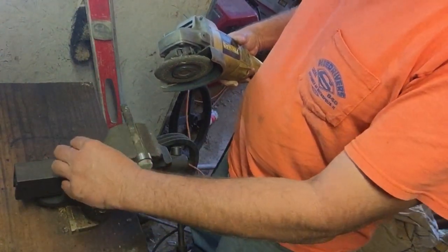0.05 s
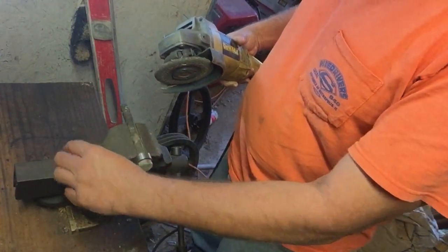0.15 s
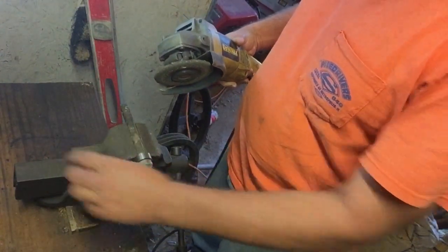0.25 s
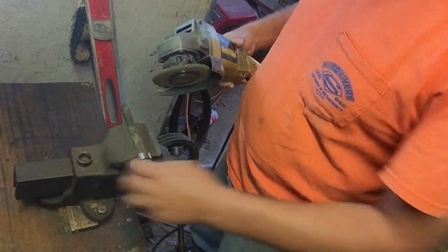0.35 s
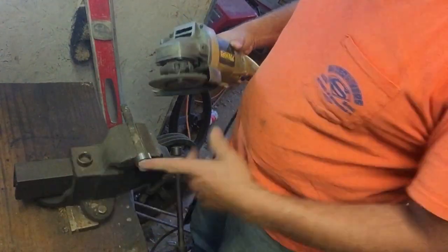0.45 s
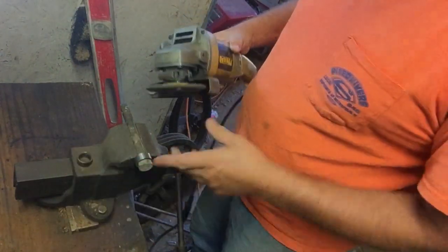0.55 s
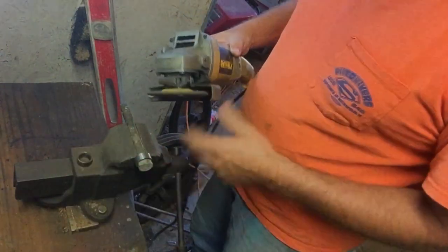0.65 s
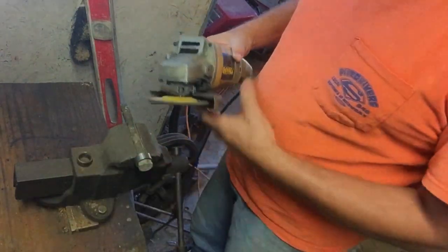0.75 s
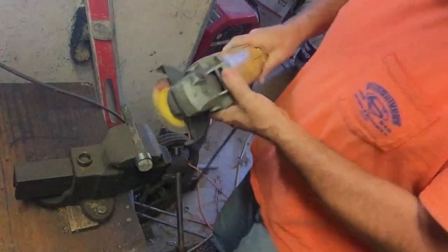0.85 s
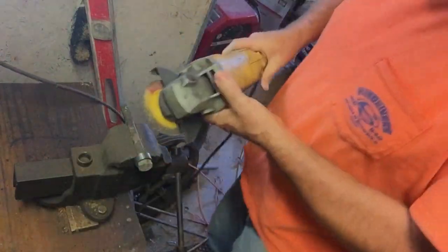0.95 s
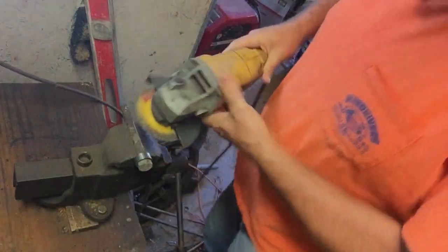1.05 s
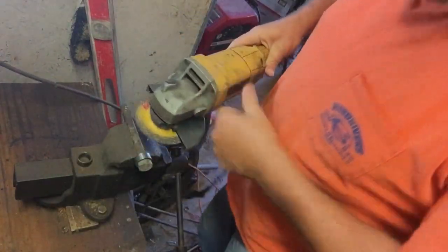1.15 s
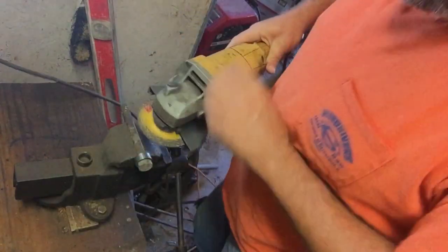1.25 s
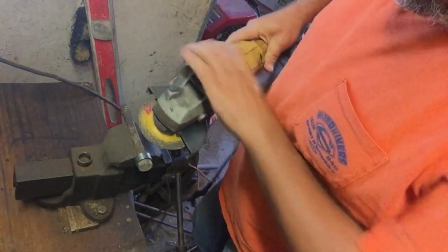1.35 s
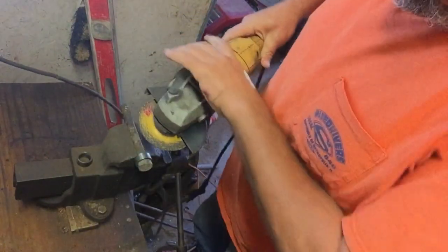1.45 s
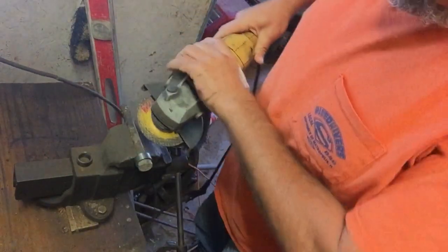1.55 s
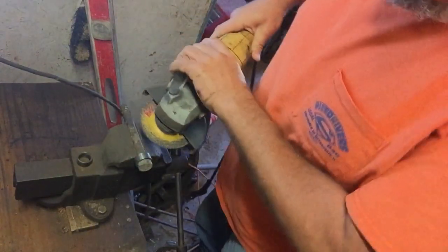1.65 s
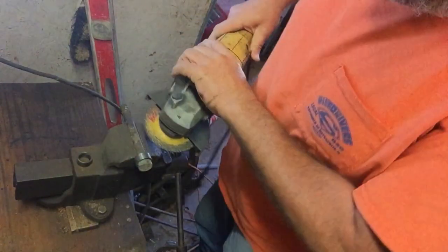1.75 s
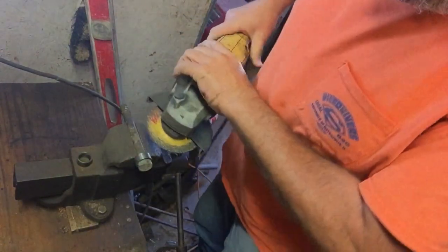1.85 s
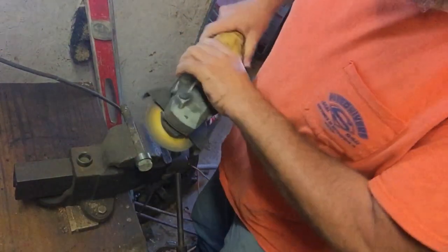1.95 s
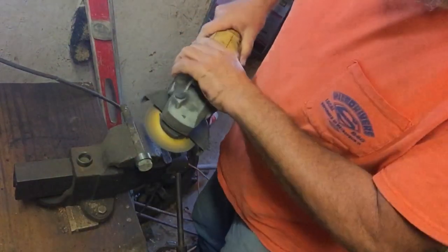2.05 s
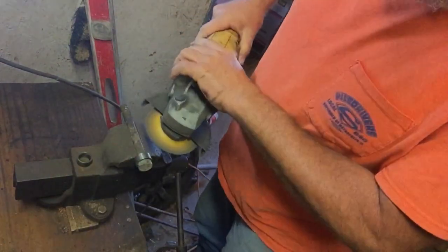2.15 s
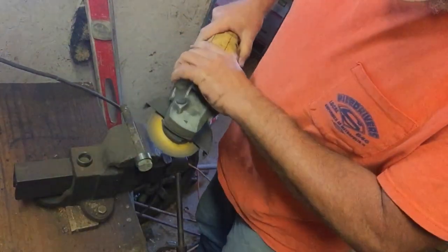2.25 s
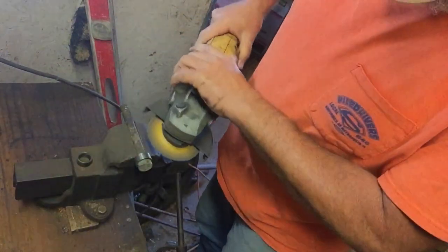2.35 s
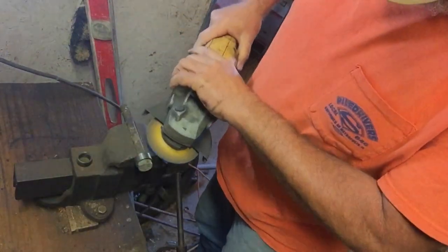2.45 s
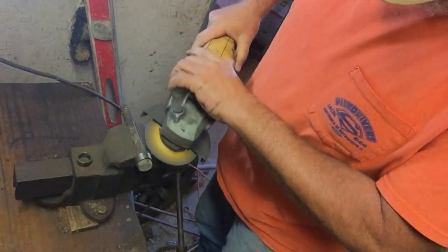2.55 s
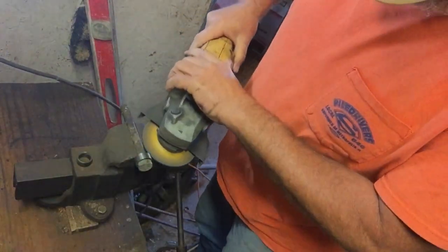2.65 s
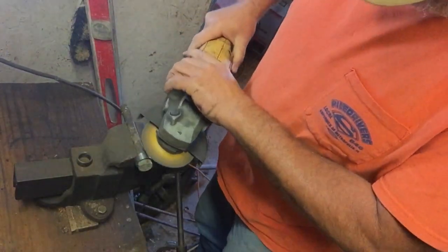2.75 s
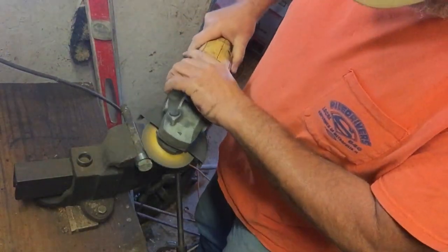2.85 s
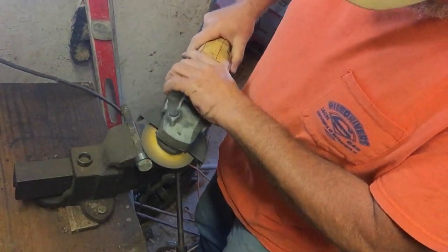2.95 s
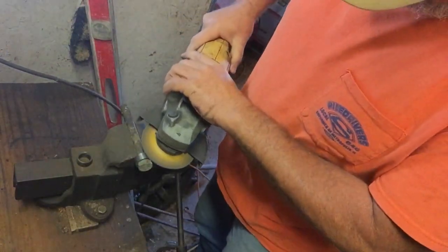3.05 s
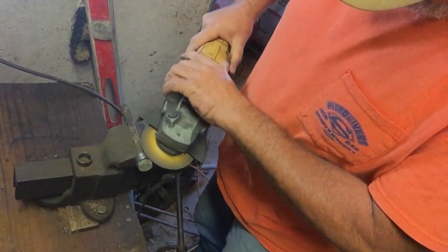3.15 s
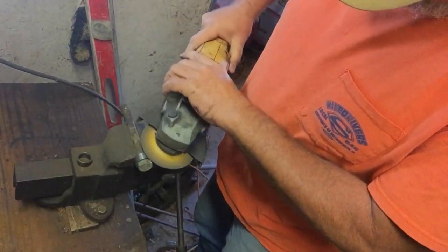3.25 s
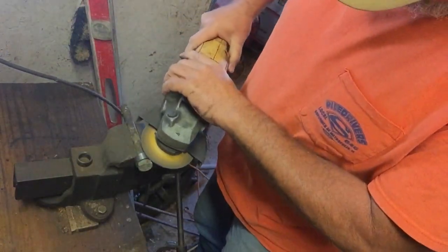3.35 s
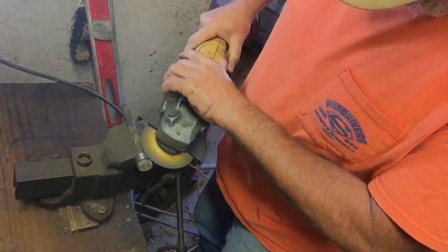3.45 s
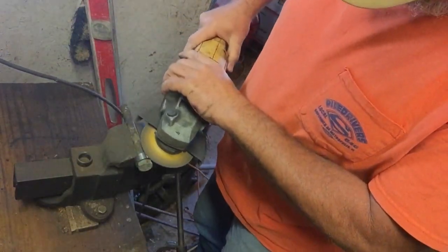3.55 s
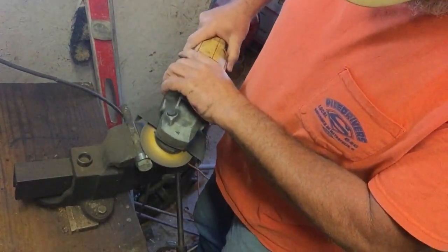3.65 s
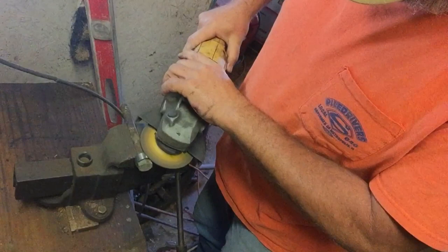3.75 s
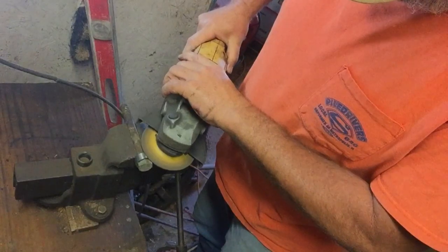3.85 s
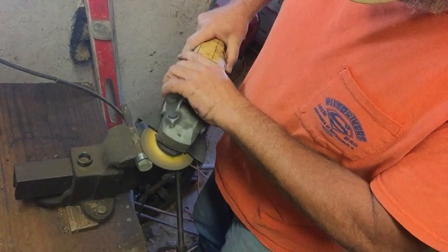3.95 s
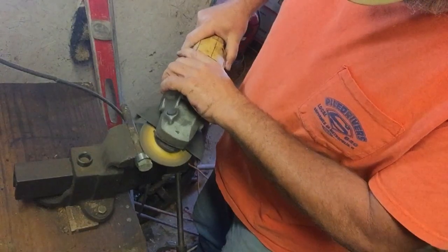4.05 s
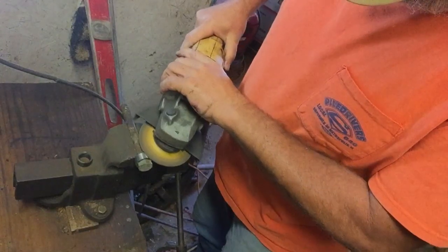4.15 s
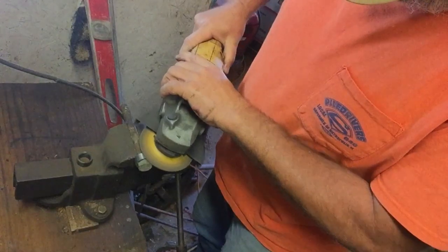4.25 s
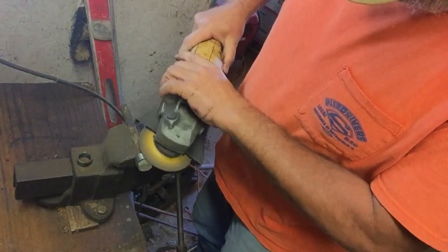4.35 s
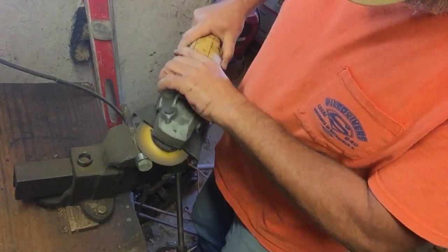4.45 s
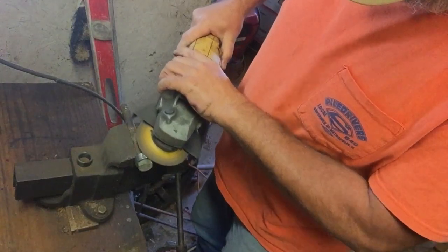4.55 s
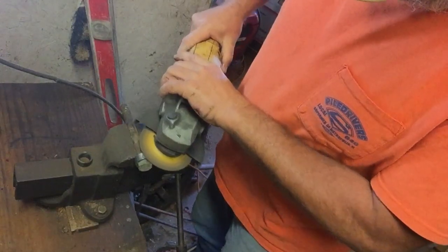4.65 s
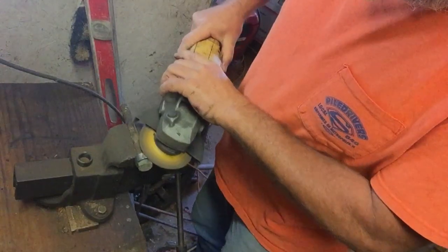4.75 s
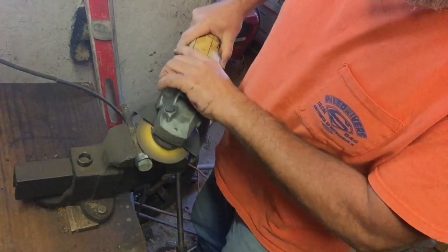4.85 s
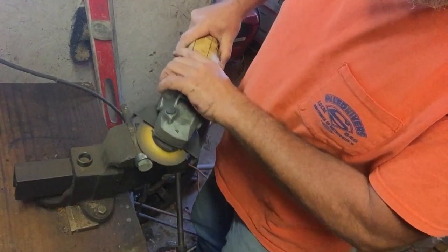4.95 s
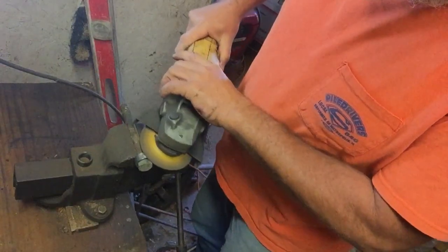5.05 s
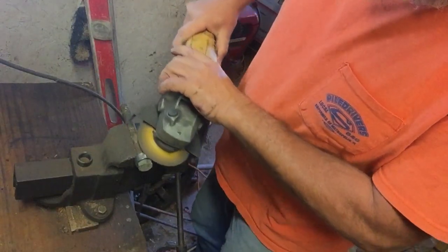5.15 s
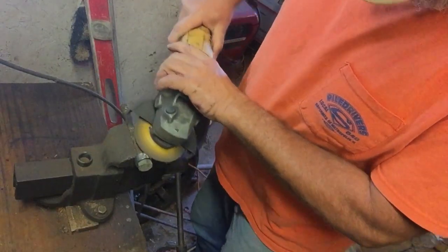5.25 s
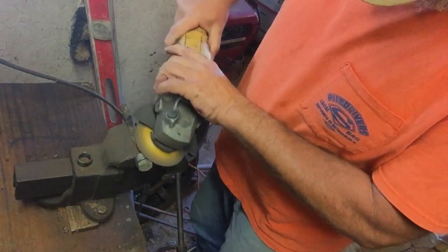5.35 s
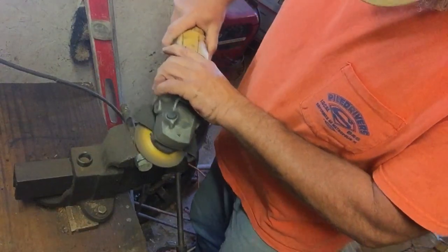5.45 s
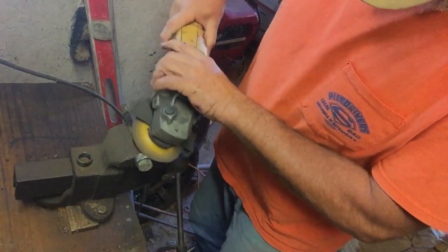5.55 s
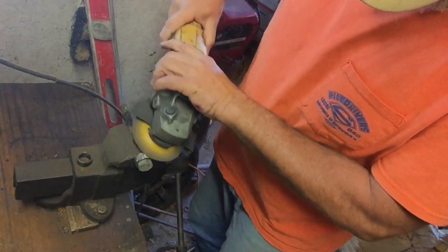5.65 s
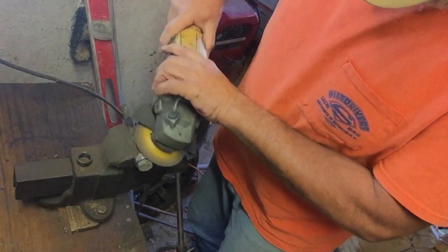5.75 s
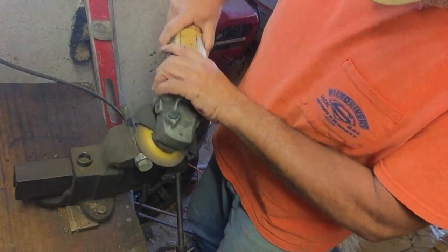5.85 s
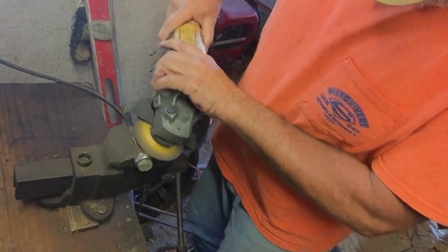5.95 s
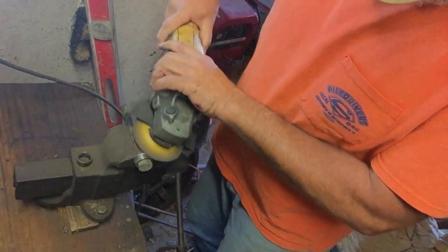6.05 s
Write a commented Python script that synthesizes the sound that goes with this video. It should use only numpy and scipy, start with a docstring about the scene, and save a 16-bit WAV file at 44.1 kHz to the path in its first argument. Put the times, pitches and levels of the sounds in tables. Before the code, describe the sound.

Close microphone, small dry room, no stereo spread. Soft hiss and low hum, handling clacks from a power tool, a faint metallic touch on the vise. At about two seconds the angle grinder starts with crackling pops, sweeps up in pitch and settles into a harsh, buzzing gear rattle with airy fan hiss. It runs free briefly, then presses onto clamped steel: pitch sags slightly, and a piercing scrape and ringing join, held to the end.

```python
"""Over a background of hiss and hum, an angle grinder is handled with knocks and a thud: struck, decaying modes.
The recorder turns its level down abruptly, so hiss and hum become fainter; the wheel clinks on the vise.
At switch-on the brushes pop (filtered impulses) and sputter. The motor spins up: random tooth blows rattle case
and guard, fan noise and shaft multiples howl and whine; the brushes squeal briefly. Then the wheel skims and is
leaned into steel: noise modulated by the wheel's turning is filtered into scrape and ring, over a bench rumble.
A small workshop, close by, the same in both channels."""
import sys
import numpy as np
from scipy import signal
from scipy.fft import rfft, irfft
from scipy.io import wavfile
from scipy.ndimage import uniform_filter1d

SR = 44100
rng = np.random.default_rng(int(sys.argv[2]) if len(sys.argv) > 2 else 0)


def wav_out(sig):
    """Save sig, one row per channel (or a flat mono array), as 16-bit PCM at SR to the path in sys.argv[1]."""
    wavfile.write(sys.argv[1], SR, np.round(np.clip(np.atleast_2d(sig).T, -1, 1) * 32767).astype(np.int16))


N = 269451

# Background hiss spectrum. Each row: frequency in Hz, relative level in dB.
AIR_SPECTRUM = [(47, -33), (80, -3), (201, -6), (371, -4.5), (515, -11), (669, -5), (797, -15), (890, -8.5),
                (6670, -19), (15000, -30)]
# Handling knocks. Each row: start in s, peak level in dB, centre brightness in Hz, rise in s, t60 in s.
KNOCKS = [(0.43, -44, 900, 0.0061, 0.44), (0.503, -24, 1480, 0.0016, 0.1),
          (0.506, -38.5, 4300, 0.0018, .06), (0.510, -29.5, 200, 0.0042, 0.26),
          (0.536, -31, 3580, .003, 0.083), (0.545, -18, 2650, 0.0035, 0.052),
          (0.564, -29, 400, 0.00224, 0.064), (0.813, -51, 1100, 0.0043, 0.043),
          (0.864, -48, 800, .004, 0.042), (1.066, -47, 397, 0.0081, 0.088), (1.423, -56, 550, 0.0094, 0.12),
          (1.560, -49.5, 3720, 0.016, .13), (1.618, -44.5, 850, 0.0019, 0.056),
          (2.038, -44, 1000, .002, 0.044)]
# Tool modes rung by handling. Each row: frequency in Hz, relative level in dB.
HANDLED_MODES = [(150, 3.5), (215, 2), (285, -1), (465, 3), (600, -3), (1140, 1.5), (1220, 6.5), (1950, -1),
                 (2060, 2.5), (2200, -5), (2550, -6), (3165, 2), (3290, 1), (3720, -4), (4200, -11),
                 (4550, -13)]
# Wheel touching the vise. Each row: frequency in Hz, level in dB, t60 in s.
CLINK_MODES = [(226, -50, 0.15), (570, -62, .15), (1330, -44.5, 0.29), (1376, -43, 0.24), (1560, -48, .1),
               (2500, -55, .1), (3467, -61, .15)]
# Scuff spectrum of that touch. Each row: frequency in Hz, relative level in dB.
CLINK_SCUFF = [(100, -15), (300, 5), (800, -5), (1500, 5), (3500, -15), (7000, -36)]
# Spin-up in a fast and a slow stage. Each row: turns per second gained in Hz, time constant in s.
SPIN_UP = [(165.3, .0987), (129.8, .554)]
# Starting torque jolts the gears. Each row: centre in s, half length (to 1/e) in s, boost in dB.
JOLTS = [(2.08, 0.02, 2.5), (2.11, 0.015, 5), (2.165, 0.01, 3.5)]
# Gear case and guard spectrum. Each row: frequency in Hz, relative level in dB.
CASE_SPECTRUM = [(30, -50), (60, -44), (130, -47), (220, -21), (370, -23.5), (500, -17), (800, -18),
                 (1150, -13), (1520, -3.5), (2100, -3.5), (2450, -4), (2900, -3), (4000, -7), (5100, -16.5),
                 (15000, -42)]
# Sheet-steel guard resonances. Each row: frequency in Hz, width in Hz, boost in dB.
GUARD_MODES = [(267, 29, 3), (492.6, 33, 8.5), (933, 25, 6), (1567, 35, 4), (2020, 92, 5.5), (2134, 43, 8),
               (2256, 120, 5.5), (2813, 61, 6), (3087, 70, 4.5)]
# Air rushing through the vents. Each row: frequency in Hz, relative level in dB.
VENT_SPECTRUM = [(2000, -26), (5000, -19), (6300, 13.5), (7300, 7.5), (9300, 5.5), (10400, -2), (11400, 0),
                 (14000, -0.5), (16000, -7)]
# Fan lines. Each row: multiple of rotor speed, level in dB at free speed.
FAN_ORDERS = [(1, -41.5), (2, -44.5), (4, -39.5), (7, -26.5), (8, -31.5), (10, -32.5), (12, -43)]
# Commutator whine, lower and upper group. Each row: multiple of rotor speed, relative level in dB.
LOW_WHINE_ORDERS = [(21, -7), (25, -11), (26, -0.5), (32, -10)]
HIGH_WHINE_ORDERS = [(31, 0), (32, -17), (36, -13), (37, -20)]
# Tool resonances that the tones sweep through. Each row: frequency in Hz, width in Hz, gain in dB.
HOWL_PEAKS = [(1820, 60, -29), (1974, 62, -13)]
LOW_WHINE_PEAKS = [(8450, 700, -36), (9950, 520, -35.5)]
HIGH_WHINE_PEAKS = [(9100, 700, -36), (10900, 1200, -29.5)]
# Brush pops under inrush current, about whole mains cycles apart. Each row: time in s, level in dB.
SPARKS = [(2.145, -11), (2.162, -29), (2.194, -21), (2.210, -6.5), (2.262, -10), (2.278, -17),
          (2.294, -11.5), (2.310, -13), (2.344, -12), (2.360, -20), (2.377, -9.5)]
# Spectrum of pops and sputter. Each row: frequency in Hz, relative level in dB.
SPARK_SPECTRUM = [(40, -45), (110, -22), (250, -5), (350, -8), (530, 1), (800, -4), (1000, 0), (1400, -12),
                  (4000, -28), (12000, -50)]
# Brush squeal. Each row: multiple of rotor speed, relative level in dB.
SQUEAL_ORDERS = [(36, 0), (37, -2), (39, -4), (40, -1), (41, 0), (42, -2)]
# Wheel skims the steel, then is leaned in and held. Each row: time in s, pressure (1 = steady grinding).
PRESSURE = [(3.36, 0), (3.5, .08), (3.65, .55), (3.85, .6), (3.9, .98), (4.7, 1.06), (5.45, .96)]
# Grit on steel. Each row: frequency in Hz, relative level in dB.
SCRAPE_SPECTRUM = [(300, -13.5), (1200, -2), (3000, -6), (4500, 10), (5200, 2.5), (7600, -2), (8300, 9),
                   (8900, 2), (9700, 9), (10400, -17), (11200, 0), (12800, -5), (16000, -15)]
# Modes of the clamped part. Each row: frequency in Hz, width in Hz, relative level in dB.
STEEL_MODES = [(5800, 260, -6.5), (6680, 60, -1), (6850, 45, 2.5), (9680, 130, -8.5)]
# Clamped part sings out. Each row: centre in s, half length (to 1/e) in s, boost in dB.
FLARES = [(4.47, 0.043, 5.5), (4.8, 0.058, 3.5), (5.2, 0.076, 4), (5.6, 0.043, 7.5), (5.98, 0.1, 6)]
# Vise and bench spectrum. Each row: frequency in Hz, relative level in dB.
BENCH_SPECTRUM = [(25, -42), (58, -19), (80, -24), (118, 1.5), (150, -3), (190, -2), (280, -9), (500, -28),
                  (1500, -23)]

TURN_DOWN_S, HISS_DB, FAINTER_DB = .882, -58, -67  # hiss and hum level before and after the recorder turns down
CLINK_S = 1.018
ON_S = 2.069
FREE_HZ, SAG_HZ, INERTIA_S = 406.3, 16.8, .13  # free speed, loss at pressure 1, lag behind pressure
RATTLE_DB, RATTLE_SLOW_DB = -14.5, -3  # at free speed; change per unit of missing relative speed
HOWL_DB, LOW_WHINE_DB, HIGH_WHINE_DB = -28, -48, -51  # at free speed, away from resonances
HOWL_LOAD_DB, HIGH_WHINE_LOAD_DB = -3, 3  # change at pressure 1
SQUEAL_S, SQUEAL_LENGTH_S, SQUEAL_DB = 2.48, .08, -39
GEAR_RATIO = 6 / 17  # wheel turns per rotor turn
SCRAPE_DB, RING_DB, RUMBLE_DB = -24.5, -27.5, -35  # at pressure 1
TOP_HZ = 15750


def undb(db):
    """Decibels to gain."""
    return 10 ** (np.asarray(db) / 20)


def unit(x):
    """Scale to rms 1."""
    return x / np.sqrt(np.mean(x ** 2) + 1e-20)


def clock():
    """Time of each sample in seconds."""
    return np.arange(N) / SR


def curves(table):
    """Each column after the time column, joined by straight lines in time."""
    s, *columns = np.transpose(table)
    return [np.interp(clock(), s, column) for column in columns]


def swells(table):
    """Gaussian bumps (s, half length s, dB), summed in dB."""
    return sum(db * np.exp(-((clock() - s) / length_s) ** 2) for s, length_s, db in table)


def fade(start_s, t60_s):
    """A sudden start and an exponential decay."""
    age_s = clock() - start_s
    return (age_s >= 0) * np.exp(-np.log(1000) * np.maximum(age_s, 0) / t60_s)


def noise():
    """White noise."""
    return rng.standard_normal(N)


def walk(rate_hz):
    """Slow random drift, rms 1: noise smoothed twice over 1 / rate."""
    size = max(int(SR / rate_hz), 2)
    return unit(uniform_filter1d(uniform_filter1d(noise(), size), size))


def response(points):
    """Minimum-phase impulse response of a (Hz, dB) spectrum; peak 1."""
    hz, db = np.transpose(points)
    size = 8192
    grid_hz = np.maximum(np.fft.rfftfreq(size, 1 / SR), 1)
    grid_db = np.interp(np.log(grid_hz), np.log(hz), db)
    cepstrum = irfft(np.log(undb(grid_db)))
    # fold onto positive time
    cepstrum[1:size // 2] *= 2
    cepstrum[size // 2 + 1:] = 0
    h = irfft(np.exp(rfft(cepstrum)))
    return h / np.abs(h).max()


def colour(x, points):
    """Filter by a (Hz, dB) spectrum; rms 1."""
    return unit(signal.fftconvolve(x, response(points))[:N])


def resonator(x, hz, width_hz):
    """One resonance, gain 1 at its peak."""
    b, a = signal.iirpeak(hz, hz / width_hz, SR)
    return signal.lfilter(b, a, x)


def resonate(x, modes):
    """Parallel (Hz, width Hz, dB) resonances; rms 1."""
    return unit(sum(undb(db) * resonator(x, hz, width_hz) for hz, width_hz, db in modes))


def boost(x, modes):
    """Lift each (Hz, width Hz, dB) resonance above the rest; rms 1."""
    return unit(x + sum((undb(db) - 1) * resonator(x, hz, width_hz) for hz, width_hz, db in modes))


def lines(turns, orders, shake, flutter_db):
    """Multiples of shaft rotation; each trembles in phase (shake, radians) and level."""
    out = np.zeros(N)
    for order, db in orders:
        gain = np.sqrt(2) * undb(db + flutter_db * walk(36))
        out += gain * np.sin(2 * np.pi * round(order) * turns + shake * walk(60))
    return out


def background():
    """Soft hiss over a low, unsteady hum; the recorder turns its level down abruptly, so both become fainter."""
    db = np.where(clock() < TURN_DOWN_S, HISS_DB, FAINTER_DB)
    hum = np.sqrt(2) * np.sin(2 * np.pi * 57 * clock() + .3 * walk(6))
    return undb(db) * (colour(noise(), AIR_SPECTRUM) + undb(-4.5 + walk(5)) * hum)


def knock(bright_hz, rise_s, t60_s):
    """A short scuffing contact rings the modes near its own brightness; peak 1."""
    t = np.arange(SR // 4) / SR
    decay = np.exp(-np.log(1000) * t / t60_s)
    ring = np.zeros(len(t))
    for hz, db in HANDLED_MODES:
        nearness = np.exp(-(np.log2(hz / bright_hz) / 1.62) ** 2)
        ring += undb(db) * nearness * np.sin(2 * np.pi * (hz * t + rng.random()))
    band_hz = [0.5 * bright_hz, 1.27 * bright_hz]
    band = signal.butter(3, band_hz, "band", fs=SR, output="sos")
    scuff = unit(signal.sosfilt(band, rng.standard_normal(len(t))))
    attack = np.minimum(t / rise_s, 1) ** 2
    out = (ring + 1.86 * scuff * np.sqrt(decay)) * decay * attack
    return out / np.abs(out).max()


def handling():
    """Knocks on the tool, a low thud through the bench, and a clink and scuff of the wheel on the vise."""
    t = clock()
    knocks = np.zeros(N)
    for s, db, bright_hz, rise_s, t60_s in KNOCKS:
        blow = undb(db) * knock(bright_hz, rise_s, t60_s)
        start = int(s * SR)
        knocks[start:start + len(blow)] += blow
    thud = undb(-34) * np.exp(-((t - .605) / 0.04) ** 2) * np.sin(2 * np.pi * 56 * t)
    clink = np.zeros(N)
    for hz, db, t60_s in CLINK_MODES:
        clink += undb(db) * fade(CLINK_S, t60_s) * np.sin(2 * np.pi * hz * (t - CLINK_S))
    scuff = undb(-47) * fade(CLINK_S, 0.21) * colour(noise(), CLINK_SCUFF)
    return knocks + thud + clink + scuff


def rotor_speed(pressure):
    """Turns per second: exponential spin-up from the switch, lagged sag as the wheel is pressed on."""
    age_s = np.maximum(clock() - ON_S, 0)
    follow = 1 / (INERTIA_S * SR)
    load = signal.lfilter([follow], [1, follow - 1], pressure)
    missing_hz = sum(hz * np.exp(-age_s / lag_s) for hz, lag_s in SPIN_UP)
    return FREE_HZ - missing_hz - SAG_HZ * load


def impacts(turns, scatter_db, count):
    """About one blow per tooth, of uneven strength and a little early or late."""
    passed = np.floor(count * turns + .25 * walk(3000))
    where = np.flatnonzero(np.diff(passed))
    strength = noise() * undb(scatter_db * noise())
    blows = np.zeros(N)
    blows[where] = strength[where]
    return unit(blows)


def tone_gain(speed, peaks, floor_db, order):
    """A multiple of rotor speed grows with speed cubed and swells near each resonance."""
    pitch_hz = order * speed * FREE_HZ
    swell = sum(undb(db) / (1 + (2 * (pitch_hz - hz) / width_hz) ** 2) for hz, width_hz, db in peaks)
    return np.hypot(swell, undb(floor_db) * speed ** 3)


def gear_rattle(turns, speed, shudder):
    """Tooth blows and noise excite the gear case and guard."""
    db = RATTLE_DB + RATTLE_SLOW_DB * (1 - speed) + swells(JOLTS) + 0.32 * walk(14)
    teeth = impacts(turns, scatter_db=1.0, count=12) + 0.55 * noise()
    return undb(db) * boost(colour(teeth * shudder, CASE_SPECTRUM), GUARD_MODES)


def motor_tones(turns, speed, pressure):
    """Fan howl and commutator whine swell through resonances; load damps the howl, lifts the high whine."""
    howl = tone_gain(speed, HOWL_PEAKS, HOWL_DB, order=5)
    howl = howl * lines(turns, [(5, 0)], shake=.14, flutter_db=.7)
    low = tone_gain(speed, LOW_WHINE_PEAKS, LOW_WHINE_DB, order=26)
    low = low * lines(turns, LOW_WHINE_ORDERS, shake=0.34, flutter_db=0.0)
    high = tone_gain(speed, HIGH_WHINE_PEAKS, HIGH_WHINE_DB, order=31)
    high = high * lines(turns, HIGH_WHINE_ORDERS, shake=.45, flutter_db=3.0)
    return undb(HOWL_LOAD_DB * pressure) * howl + low + undb(HIGH_WHINE_LOAD_DB * pressure) * high


def brush_squeal(turns):
    """The brushes squeal briefly on the way up, at multiples of rotor speed."""
    envelope = np.exp(-((clock() - SQUEAL_S) / SQUEAL_LENGTH_S) ** 2)
    return undb(SQUEAL_DB) * envelope * lines(turns, SQUEAL_ORDERS, shake=.8, flutter_db=-2)


def motor(turns, speed, pressure):
    """Gears rattle, the fan howls and hisses with speed, the commutator whines, the mains hums."""
    ripple = np.sin(2 * np.pi * 120 * clock())  # twice mains frequency
    # random shudder, an uneven load twice a rotor turn and mains ripple make the rattle harsh
    shudder = undb(0.73 * walk(86) + 1.0 * np.sin(4 * np.pi * turns) + .5 * ripple)
    rattle = gear_rattle(turns, speed, shudder)
    air = undb(-27.5 + 0.68 * walk(8.2)) * speed ** 1.2 * colour(noise() * shudder, VENT_SPECTRUM)
    hum = undb(-55) * ripple
    fan = speed ** 3 * lines(turns, FAN_ORDERS, shake=0.056, flutter_db=2.0)
    return rattle + air + hum + fan + motor_tones(turns, speed, pressure) + brush_squeal(turns)


def inrush(speed):
    """Heavy current below free speed: brushes pop at the start; mains-pulsed sputter follows missing speed."""
    pops = np.zeros(N)
    for s, db in SPARKS:
        pops[int(s * SR)] = undb(db)
    first_s = SPARKS[0][0]
    mains = undb(5 * np.cos(2 * np.pi * 60 * (clock() - first_s)))
    current = np.clip(3.0 * (1 - speed), 0, 1)
    sputter = undb(-28.5) * mains * current * colour(noise(), SPARK_SPECTRUM)
    return signal.fftconvolve(pops, response(SPARK_SPECTRUM))[:N] + sputter


def grinding(turns, pressure):
    """Grains repeat every wheel turn among fresh ones; scrape, ring and rumble grow with pressure."""
    wheel_turns = turns * GEAR_RATIO
    angle = wheel_turns % 1
    rim = rng.standard_normal(size=320)
    grains = unit(np.interp(angle, np.linspace(0, 1, len(rim)), rim))
    high_side = np.exp(0.85 * (np.cos(2 * np.pi * angle) - 1))  # presses harder once a turn
    force = (0.96 + high_side) * undb(1.0 * walk(58))
    grit = force * (0.7 * grains + noise() * undb(1.1 * noise()))
    scrape_gain = undb(SCRAPE_DB + 0.26 * walk(3.9)) * pressure ** 1.6
    scrape = scrape_gain * colour(grit, SCRAPE_SPECTRUM)
    ring_gain = undb(RING_DB + swells(FLARES) + 1.0 * walk(27)) * pressure ** 0.21
    ring = ring_gain * resonate(grit, STEEL_MODES)
    wobble = lines(wheel_turns, [(1, -7.5), (2, -12.5)], shake=0.84, flutter_db=2.5)
    rumble_gain = undb(RUMBLE_DB + 1.4 * walk(13)) * pressure ** 0.87
    rumble = rumble_gain * (colour(noise(), BENCH_SPECTRUM) + wobble)
    return scrape + ring + rumble


def workshop(x, t60_s, wet_db):
    """Bench and near walls return a short, diffuse echo: convolution with decaying noise."""
    tail = (noise() * fade(0.0035, t60_s))[:SR // 2]
    tail = tail / np.sqrt(np.sum(tail ** 2))
    return x + undb(wet_db) * signal.fftconvolve(x, tail)[:N]


def scene():
    """Handling, then the running tool, in the workshop over background hiss and hum."""
    pressure = np.maximum(curves(PRESSURE)[0], 0)
    rotor_hz = rotor_speed(pressure)
    speed = rotor_hz / FREE_HZ
    # speed trembles a little, and wanders with the hand while the wheel cuts
    tremble = 1 + .0006 * walk(15) + .002 * pressure * walk(4)
    turns = np.cumsum(rotor_hz * tremble) / SR
    switch = np.clip((clock() - ON_S) / .006, 0, 1)
    tool = switch * (motor(turns, speed, pressure) + inrush(speed) + grinding(turns, pressure))
    mono = workshop(tool + handling(), t60_s=.22, wet_db=-16) + background()
    return np.array([mono, mono])


def record(dry):
    """The recorder rounds the highest peaks, then cuts the deepest bass and the top."""
    rounded = np.tanh(.9 * dry) / .9
    bass_cut = signal.butter(3, 38, "high", fs=SR, output="sos")
    top_cut = signal.ellip(10, .2, 80, TOP_HZ, fs=SR, output="sos")
    return signal.sosfilt(top_cut, signal.sosfilt(bass_cut, rounded))


dry = scene()
out = record(dry)
wav_out(out)
```